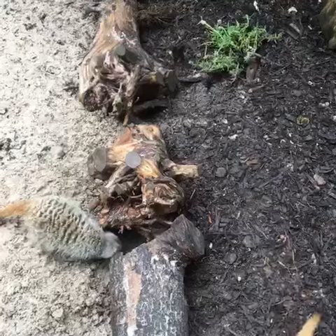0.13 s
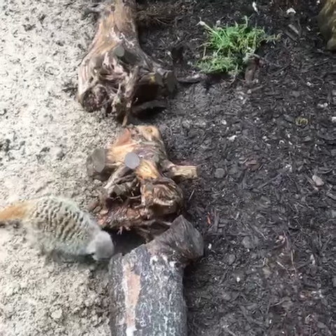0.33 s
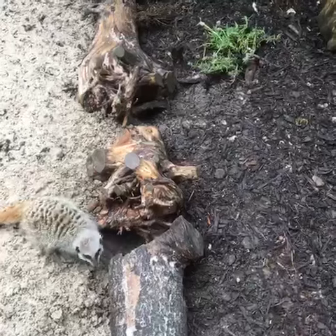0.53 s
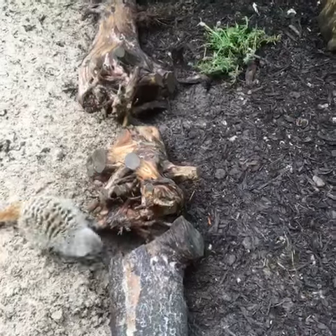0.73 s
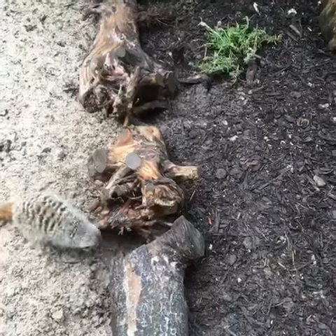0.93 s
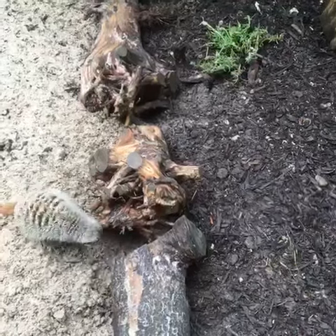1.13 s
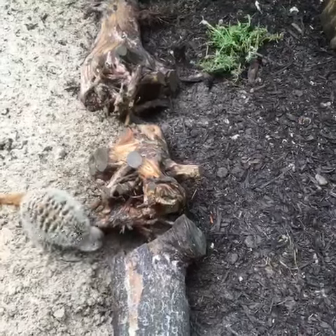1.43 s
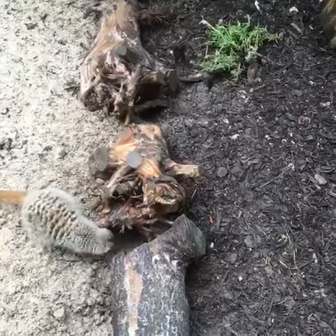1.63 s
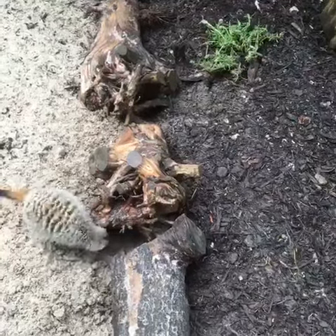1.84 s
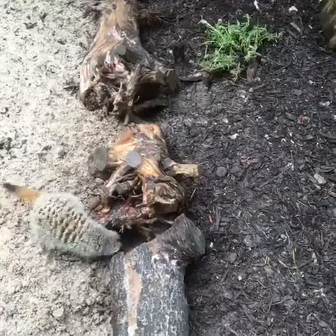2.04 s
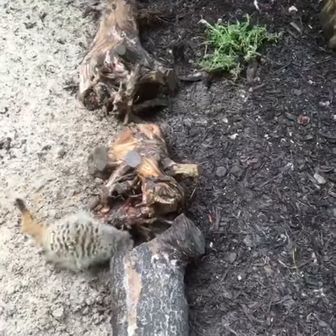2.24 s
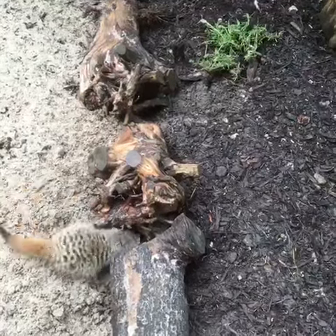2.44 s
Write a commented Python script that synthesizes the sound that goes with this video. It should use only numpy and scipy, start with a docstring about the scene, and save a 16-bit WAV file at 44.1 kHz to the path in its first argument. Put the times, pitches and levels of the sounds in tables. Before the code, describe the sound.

A meerkat gives four short low grunts while faintly scuffing in sand.

```python
"""A meerkat forages between logs, close to one microphone in an outdoor enclosure, over a low rumble.
First a paw scuffs the sand and bits of bark snap. From 0.8 s come three low grunts, each a roll of three
or four short bursts of the vocal folds; the first ends in a thin squeak. Claws tick and scrape on bark,
a fourth grunt follows at 2.25 s, and a last scuff ends it. Logs and walls faintly answer grunts and clicks."""
import sys
import numpy as np
from scipy import signal
from scipy.fft import rfft, irfft, next_fast_len
from scipy.io import wavfile
from scipy.ndimage import map_coordinates

SR = 44100
rng = np.random.default_rng(int(sys.argv[2]) if len(sys.argv) > 2 else 0)


def dump_mix(stems):
    """Bounce the given channels to the path in sys.argv[1] as a 16-bit WAV at rate SR."""
    frames = np.atleast_2d(stems).T  # one column per channel
    limited = np.clip(frames, -1, 1)  # hard clip at full scale
    pcm = np.round(limited * 32767).astype(np.int16)
    wavfile.write(sys.argv[1], SR, pcm)


N = 114660

# The rumble and the hiss of the place. Each row: frequency in Hz, relative level in dB.
RUMBLE_SPECTRUM = [(20, -27), (32, -8.5), (45, 2.5), (68, 1.5), (85, -6), (120, -11), (170, -23.5),
                   (300, -39)]
HISS_SPECTRUM = [(130, -7.5), (230, -2.5), (360, -4.5), (480, -10), (950, -8.5), (1400, -12), (2000, -16.5),
                 (2800, -19.5), (4500, -22), (7000, -24.5), (10000, -28), (15000, -33)]
# The rumble's wavering at the microphone. Each row: time in seconds, level in dB.
RUMBLE_LEVELS = [(0.02, -59.5), (0.22, -51), (0.25, -60.5), (0.36, -51), (0.48, -61.5), (0.5, -51.5),
                 (1.0, -58.5), (1.03, -65), (1.07, -55.5), (1.47, -56.5), (1.49, -52), (1.71, -56),
                 (1.74, -51.5), (2.38, -55.5), (2.43, -59.5), (2.58, -56.5)]
# The answer of logs and walls. Each row: frequency in Hz, time to fall 60 dB in seconds.
WALL_DECAY = [(200, 0.15), (1000, 0.17), (3000, 0.25), (10000, 0.036)]
# Snapping bark and ticking claws. Each row: start in seconds, level in dB, decay in seconds.
BARK_SNAPS = [(.3136, -48, 0.0012), (0.316, -42, 0.00093), (0.3175, -45, .0009)]
CLAW_TAPS = [(.817, -59, 0.0037), (.831, -64, .005), (1.2135, -65, .001), (1.319, -63, 0.0024),
             (1.3255, -54, 0.0028), (1.658, -60, .001), (2.1056, -57.5, 0.0018)]
# Paws in sand and claws on bark. Each row: peak time, rise and fall in seconds, level in dB.
SAND_SCUFFS = [(.12, .1, 0.18, -75), (.825, 0.028, 0.015, -65), (1.05, 0.067, .13, -65),
               (1.45, 0.068, 0.079, -65), (1.83, 0.067, 0.069, -65.5), (2.15, 0.025, 0.035, -69),
               (2.31, 0.06, 0.043, -62), (2.56, 0.041, .06, -59)]
BARK_SCRAPES = [(1.462, 0.011, .006, -61.5), (1.846, 0.011, 0.011, -56)]
# The colours of those four contacts, close up. Each row: frequency in Hz, relative level in dB.
SNAP_SPECTRUM = [(1500, -38), (3300, -8), (5500, -14), (7200, -6), (8500, 3), (9400, -4), (10500, -14),
                 (13000, -11), (15500, -16.5)]
TAP_SPECTRUM = [(1500, -24), (3500, -6), (6000, -3), (9000, -1), (10500, -2), (12200, -1), (15000, -8)]
SAND_SPECTRUM = [(1500, -25), (3500, -4.5), (5000, -4), (7000, -2), (9300, 1.5), (10400, -3.5), (12000, 0),
                 (14000, -3), (15500, -8.5)]
SCRAPE_SPECTRUM = [(900, -26), (1900, -3), (2600, -7), (3300, 4), (3800, -5), (4600, -0.5), (5400, -3),
                   (7000, -2), (10000, -6), (15000, -16)]
# Voiced bursts, one list per grunt. Each row: start and length in seconds, start and end pitch in Hz,
# level of the fundamental in dB, then overtones, growl and rasp in dB against the fundamental.
GRUNT_BURSTS = [
    [(.778, 0.029, 329.4, 335, -43, -13.5, -12.5, -5.5), (.805, .035, 318.1, 319.2, -39, -10.5, -4, -5.5),
     (.840, 0.029, 344.2, 340, -48.5, 0, -4, -0.5)],
    [(1.040, .009, 352, 396, -49.5, -7.5, 0, 2), (1.060, 0.02, 463.7, 507, -39.5, -6.5, -15, -7),
     (1.099, 0.027, 473.5, 395, -46.5, -5, -13, -3.5)],
    [(1.379, .013, 265.3, 306, -50.5, -5.5, -29, -10), (1.393, 0.016, 356.5, 402, -39.5, -15.5, -13.5, -12),
     (1.432, .017, 349, 343, -42.5, -17, -18, -13.5), (1.462, .022, 384.5, 323, -44.5, -16, -18, -16)],
    [(2.251, .020, 407.2, 508, -39, -17.5, -18, -18), (2.284, 0.021, 399, 442, -41, -18.5, -11.5, -15.5),
     (2.324, 0.023, 341, 330, -47.5, -22, -2, -22)],
]
# Throat and mouth, one list per grunt, wide open in the first and nearly shut in the last.
# Each row: frequency in Hz, relative level in dB.
THROAT_SPECTRA = [
    [(220, -1.5), (430, 9), (600, -4.5), (790, 8.5), (900, -7.5), (1080, 0), (1420, -15.5), (1820, -2),
     (2350, -9), (2750, -15), (3300, -2.5), (3800, -25.5)],
    [(200, -4), (450, -2), (720, 4), (980, -1), (1400, -15), (1900, -16.5), (2450, -12), (3000, -28),
     (4000, -34)],
    [(200, -7), (450, 11), (750, -3), (1000, 1), (1400, -5.5), (1700, -2), (1950, -18), (2400, -7),
     (3300, -24)],
    [(200, -23), (500, 8), (750, -7), (950, -1.5), (1500, -12), (1720, -23), (1950, -8), (2400, -31),
     (3300, -25)],
]

VOICE_ROOM_DB, CLICK_ROOM_DB, WALL_DELAY_S = -13, -10.5, 0.006
GRAINS_PER_S, GRAIN_DB, GRAIN_SPREAD_DB = 500, -9.5, 8
ATTACK_S, RELEASE_S = 0.0061, 0.0081
JITTER, SHIMMER_DB, FLUTTER_PER_S = 0.03, 1.4, 420  # unsteady folds: share of pitch, level, rate
RASP_DEPTH, RASP_EXTRA_S = 0.39, 0.0031  # the rasp pulses with the folds and overlaps both ends of the tone
HUSK_DB, HUSK_MARGIN_S = -54, 0.0097  # hoarse noise that joins the bursts and reaches just beyond them
MOUTH_SHUT_DB, MOUTH_HZ, MOUTH_OPEN_S, MOUTH_LAG_S = -20, 2600, 0.023, 0.01


def amp(db):
    """Decibels to gain."""
    return 10 ** (np.asarray(db) / 20)


def unit(x):
    """Scaled to rms 1."""
    return x / np.sqrt(np.mean(x ** 2) + 1e-20)


def along(points, hz):
    """Rows of frequency and value, read on a log frequency axis."""
    freqs, values = np.transpose(points)
    return np.interp(np.log(hz + 1), np.log(freqs + 1), values)


def filtered(x, response):
    """The sound shaped by a gain that depends on frequency."""
    size = next_fast_len(N + SR // 4)
    return irfft(rfft(x, size) * response(np.fft.rfftfreq(size, 1 / SR)), size)[:N]


def colour(spectrum, hz):
    """Gain of a spectrum that falls away steeply beyond its ends."""
    low_hz, high_hz = spectrum[0][0], spectrum[-1][0]
    return amp(along(spectrum, hz)) * np.minimum(1, hz / low_hz) ** 2 / np.maximum(1, hz / high_hz) ** 2


def noise(spectrum):
    """Coloured noise of rms 1."""
    return unit(filtered(rng.standard_normal(N), lambda hz: colour(spectrum, hz)))


def outdoors(hiss_db=-62.5):
    """The open air around the microphone: a wavering low rumble and a faint even hiss."""
    rumble_db = np.interp(np.arange(N) / SR, *np.transpose(RUMBLE_LEVELS))
    return amp(rumble_db) * noise(RUMBLE_SPECTRUM) + amp(hiss_db) * noise(HISS_SPECTRUM)


def enclosure(x, wet_db):
    """The direct sound, then the short answer of nearby logs and walls."""
    hz, t, spectra = signal.stft(rng.standard_normal(SR // 3), SR, nperseg=256)
    decay = amp(-60 * t / along(WALL_DECAY, hz)[:, None])
    tail = signal.istft(spectra * decay, SR, nperseg=256)[1]
    tail = np.pad(tail / np.linalg.norm(tail), (int(WALL_DELAY_S * SR), 0))
    return x + amp(wet_db) * signal.fftconvolve(x, tail)[:N]


def clicks(rows, spectrum):
    """Little contacts of bark or claw that die in milliseconds, heard in the enclosure."""
    t = np.arange(N) / SR
    level = sum(amp(db) * (t >= start) * np.exp(-np.abs(t - start) / decay) for start, db, decay in rows)
    return enclosure(level * noise(spectrum), CLICK_ROOM_DB)


def strokes(rows):
    """The level of paw strokes that rise to a peak and fall away, added in power."""
    t = np.arange(N) / SR
    power = sum(amp(db) ** 2 * np.exp(-((t - peak) / np.where(t < peak, rise, fall)) ** 2)
                for peak, rise, fall, db in rows)
    return np.sqrt(power)


def paws():
    """Paws slide through sand, a hiss with single grains in it, and claws scrape briefly on bark."""
    hits = rng.random(N) < GRAINS_PER_S / SR
    sizes = rng.standard_normal(N) * amp(GRAIN_SPREAD_DB * rng.standard_normal(N))
    grains = unit(filtered(hits * sizes, lambda hz: colour(SAND_SPECTRUM, hz)))
    sand = unit(noise(SAND_SPECTRUM) + amp(GRAIN_DB) * grains)
    return strokes(SAND_SCUFFS) * sand + strokes(BARK_SCRAPES) * noise(SCRAPE_SPECTRUM)


def flutter():
    """The unsteadiness of the voice, a smooth random curve."""
    knots = rng.standard_normal(N // 8)
    return map_coordinates(knots, [np.arange(N) * FLUTTER_PER_S / SR], mode="wrap")


def burst(t, length):
    """Smooth attack, hold and release of one burst of voice."""
    rise = np.clip(t / ATTACK_S + 0.51, 0, 1)
    fall = np.clip((length - t) / RELEASE_S + 0.5, 0, 1)
    return np.sin(np.pi / 2 * rise * fall) ** 2


def partials(multiples, pitch, phase, throat):
    """Multiples of the pitch as the throat colours them, rms 1."""
    k = multiples[:, None]
    waves = np.cos(k * phase + 2 * np.pi * rng.random(k.shape))
    return unit((colour(throat, k * pitch) * waves).sum(0))


def mouth(x, widest_s):
    """The mouth damps the treble, opening briefly to let it out."""
    dull = filtered(x, lambda hz: 1 / (1 + (hz / MOUTH_HZ) ** 10))
    opening = np.exp(-((np.arange(N) / SR - widest_s) / MOUTH_OPEN_S) ** 2)
    return dull + (x - dull) * amp(MOUTH_SHUT_DB * (1 - opening))


def grunt(bursts, throat):
    """Bursts of a few unsteady fold cycles; alternate cycles differ, adding growl between the overtones."""
    voice = np.zeros(N)
    jitter, shimmer, breath = flutter(), flutter(), noise(throat)
    harmonics = np.arange(2, 16)
    for start, length, start_hz, end_hz, db, overtones_db, growl_db, rasp_db in bursts:
        span = np.arange(int((start - length) * SR), int((start + 2 * length) * SR))
        t = span / SR - start
        pitch = np.interp(t, [0, length], [start_hz, end_hz])
        phase = 2 * np.pi * np.cumsum(pitch * (1 + JITTER * jitter[span])) / SR
        overtones = amp(overtones_db) * partials(harmonics, pitch, phase, throat)
        growl = amp(growl_db) * partials(harmonics - 0.5, pitch, phase, throat)
        tone = (np.sqrt(2) * np.cos(phase) + overtones + growl) * burst(t, length)
        pulsed_breath = unit(breath[span] * (1 + RASP_DEPTH * np.sin(phase)))
        rasp = amp(rasp_db) * pulsed_breath * burst(t + RASP_EXTRA_S / 2, length + RASP_EXTRA_S)
        voice[span] += amp(db + SHIMMER_DB * shimmer[span]) * (tone + rasp)
    husk_start = bursts[0][0] - HUSK_MARGIN_S
    husk_end = bursts[-1][0] + bursts[-1][1] + HUSK_MARGIN_S
    arch = np.sin(np.pi * np.clip((np.arange(N) / SR - husk_start) / (husk_end - husk_start), 0, 1))
    husk = amp(HUSK_DB) * np.sqrt(np.abs(arch)) * noise(throat)
    middle = np.mean([start + length / 2 for start, length, *_ in bursts])
    return mouth(voice + husk, middle + MOUTH_LAG_S)


def squeak(start_s=0.868, length_s=0.025, hz=1050, db=-55.5, waver=0.088):
    """The thin tone that ends the first grunt, roughened by its unsteady pitch."""
    phase = 2 * np.pi * np.cumsum(hz * (1 + waver * flutter())) / SR
    return amp(db) * burst(np.arange(N) / SR - start_s, length_s) * np.sqrt(2) * np.sin(phase)


def meerkat():
    """The voice, close by: one squeak, and four grunts that the enclosure answers."""
    return squeak() + sum(enclosure(grunt(bursts, throat), VOICE_ROOM_DB)
                          for bursts, throat in zip(GRUNT_BURSTS, THROAT_SPECTRA))


def scene():
    """The animal and the place, at one microphone near the logs."""
    voice = meerkat()
    foraging = paws() + clicks(BARK_SNAPS, SNAP_SPECTRUM) + clicks(CLAW_TAPS, TAP_SPECTRUM)
    return (outdoors() + foraging + voice)[None]


def record(dry, top_hz=15450):
    """The recorder keeps nothing above its band limit."""
    return filtered(dry[0], lambda hz: hz < top_hz)[None]


dry = scene()
out = record(dry)
dump_mix(out)
```